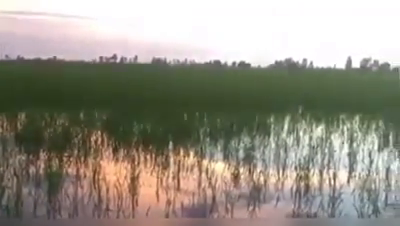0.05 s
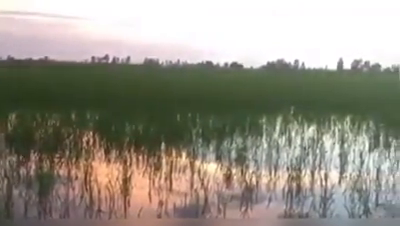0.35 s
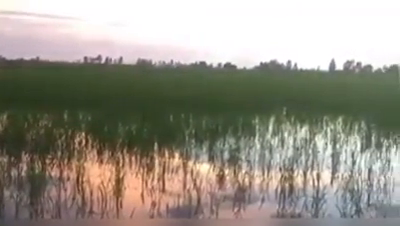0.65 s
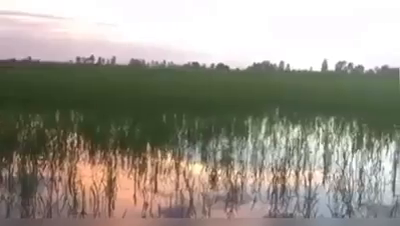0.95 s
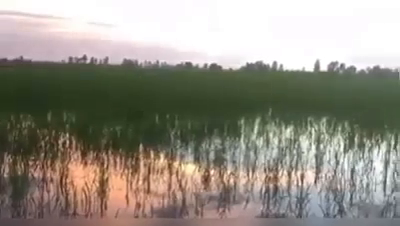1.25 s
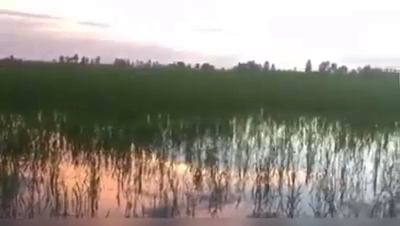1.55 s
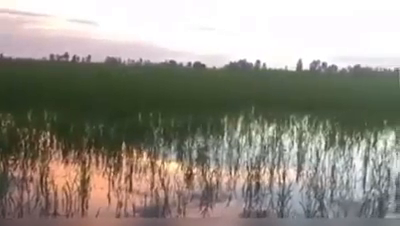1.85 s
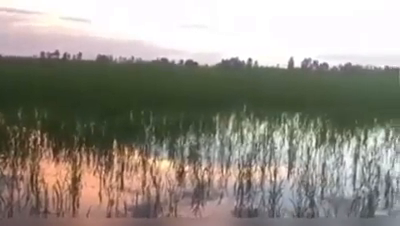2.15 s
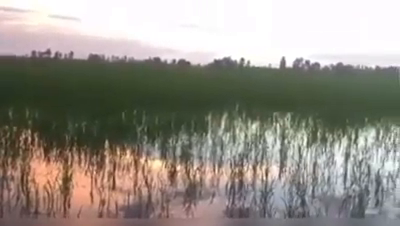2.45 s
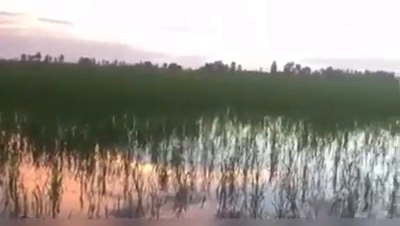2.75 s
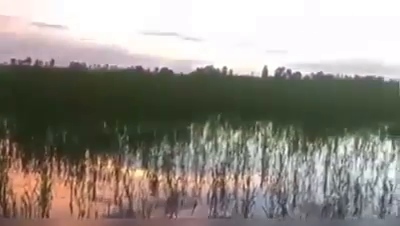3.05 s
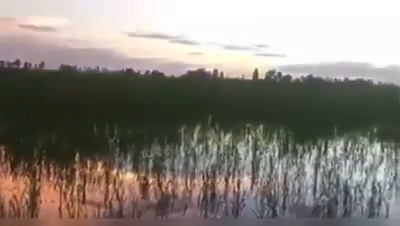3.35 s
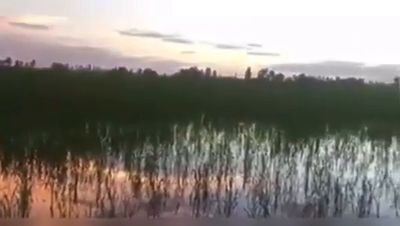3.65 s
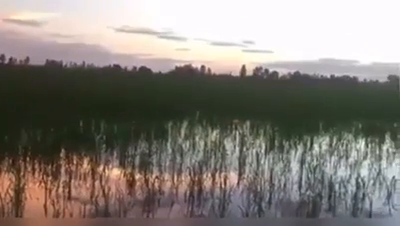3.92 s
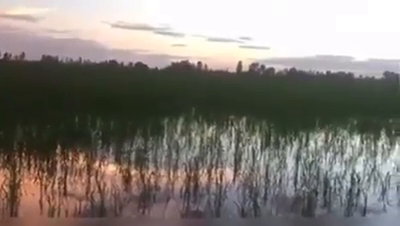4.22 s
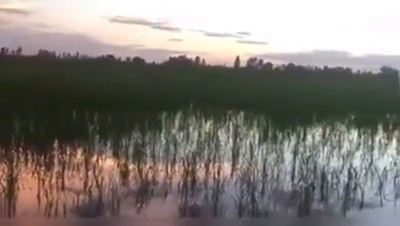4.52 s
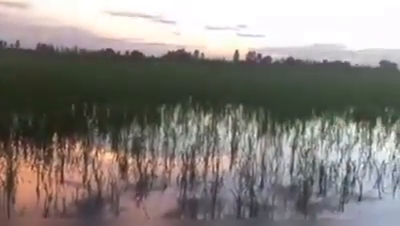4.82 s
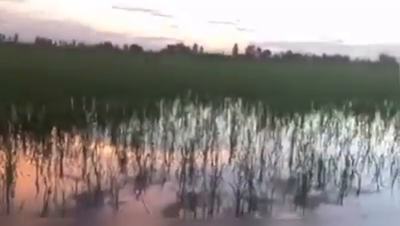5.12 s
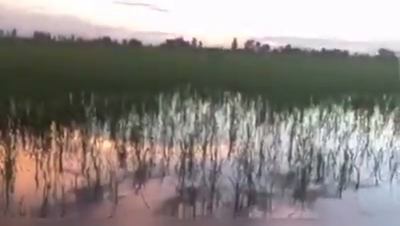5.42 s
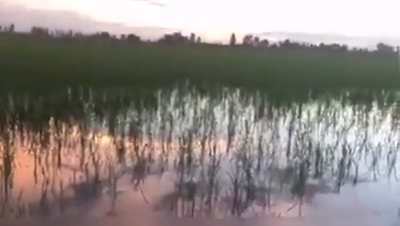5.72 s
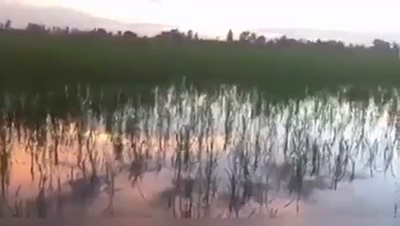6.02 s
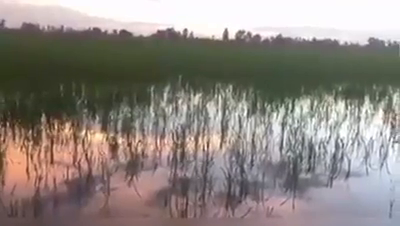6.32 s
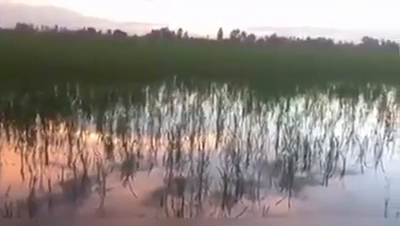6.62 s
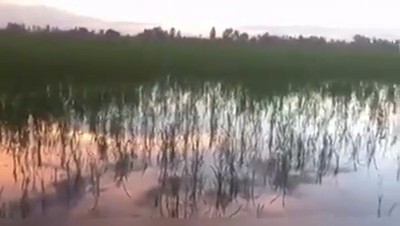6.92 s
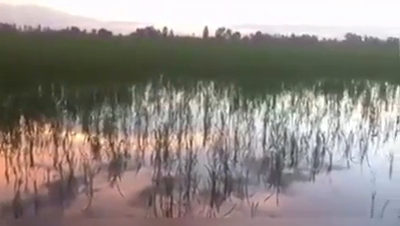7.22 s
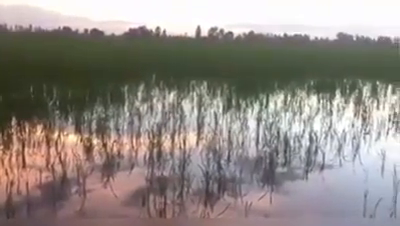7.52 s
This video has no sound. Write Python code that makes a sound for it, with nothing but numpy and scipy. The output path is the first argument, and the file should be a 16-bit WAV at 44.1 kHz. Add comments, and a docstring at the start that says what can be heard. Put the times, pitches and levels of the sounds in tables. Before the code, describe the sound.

Many frogs croak together in a dense, rapid, unbroken trill, with a faint low rumble and distant engine beneath.

```python
"""A flooded rice field at dusk: frogs croak, each about four times a second, over an answering far chorus.
A croak is a fast train of clicks ringing a vocal sac; it sinks in pitch as the pressure drops.
A clear-voiced frog leads, then one close by takes over with harsh rasps while a small one chirps between.
Hoarse and gliding neighbours join in. Far off a one-cylinder engine, probably a water pump, thuds on."""
import sys
import numpy as np
from scipy import signal
from scipy.fft import rfft, irfft
from scipy.io import wavfile
from scipy.ndimage import uniform_filter1d

SR = 44100
rng = np.random.default_rng(int(sys.argv[2]) if len(sys.argv) > 2 else 0)


def bounce(signal):
    """Save signal as a 16-bit WAV file at the path given by the first command-line argument."""
    frames = np.transpose(np.atleast_2d(signal))
    limited = np.clip(frames, -1, 1)
    pcm = np.round(limited * 32767).astype(np.int16)
    wavfile.write(sys.argv[1], SR, pcm)


N = 338247

# calls of the clear-voiced frog: t/s, sac f/Hz, level/dB
CLEAR_CALLS = [(.227, 3505, -29), (.479, 3235, -28), (.705, 3384, -30.5), (.991, 3666, -27.5),
               (1.207, 3610, -26.5), (1.419, 3550, -27), (1.633, 3644, -26.5), (1.854, 3560, -27),
               (2.061, 3516, -28), (2.271, 3540, -26.5), (2.476, 3458, -27), (2.682, 3484, -27),
               (2.894, 3480, -27.5), (3.123, 3460, -28.5)]
# rasps of the closest frog, faster, lower and duller as its bout goes on:
# t/s, length/s, pulse rate before locking to the sac/Hz, sac f/Hz, level/dB, treble/dB
RASPS = [(2.518, 0.012, 245, 3202, -30.5, 1), (2.806, 0.05, 218.3, 3376, -25, 5),
         (3.066, 0.055, 295, 3290, -25, 4), (3.306, .05, 338.3, 3215, -24.5, 4),
         (3.567, 0.063, 341.4, 3240, -25, 6.5), (3.807, 0.061, 345.6, 3317, -24.5, 0),
         (4.091, 0.065, 355, 3230, -25, -2), (4.357, 0.052, 355, 3190, -24.5, 2),
         (4.649, 0.062, 357, 3184, -25, -3), (4.888, 0.062, 364, 3160, -24.5, -2),
         (5.147, .057, 340, 3070, -25, -2), (5.449, 0.057, 340, 3040, -25.5, -2)]
# chirps of the small frog: t/s
CHIRPS = [3.235, 3.473, 3.686, 3.904, 4.13, 4.337, 4.567, 4.8, 5.040]
# croaks of the hoarse neighbours: t/s, length/s, sac f/Hz, level/dB, roughness (0 clear, 1 and up hoarse)
HOARSE_CROAKS = [(.008, 0.057, 3342, -27.5, 1.1), (0.087, 0.04, 3550, -50, 0.24),
                 (0.212, 0.042, 3390, -34, 0.42), (0.3, 0.1, 3390, -37, 0.9),
                 (0.443, 0.052, 3610, -35.5, 0.54), (0.532, 0.052, 2887, -35, 0.88),
                 (0.776, 0.032, 3680, -30.5, 0.3), (1.241, 0.037, 3360, -38.5, 0.4),
                 (1.607, 0.042, 2696, -37.5, 0.65), (1.883, 0.039, 2670, -36, 0.9),
                 (2.189, 0.04, 3216, -31.5, .8), (2.402, 0.05, 4050, -41.5, 0.24),
                 (3.01, .022, 4320, -40, 0), (3.372, 0.12, 3520, -44, 0.56), (4.249, 0.1, 3660, -51, 0.71),
                 (4.41, 0.064, 3054, -34.5, 0.5), (4.584, 0.068, 3610, -39, 0.2),
                 (4.785, 0.048, 3660, -41.5, 0.1), (5.057, 0.13, 3180, -40, 0.1),
                 (5.207, 0.044, 3410, -54, .6), (5.395, 0.064, 3470, -35, 0.18),
                 (5.537, 0.061, 3150, -36.5, 0.33), (5.655, 0.055, 3410, -36, 0.63),
                 (5.743, 0.06, 3170, -33, 0.82), (5.834, 0.053, 3750, -39, 0.4),
                 (5.879, 0.063, 3415, -35, 0.4), (5.962, 0.077, 3142, -36.5, 0.7),
                 (6.074, 0.05, 3640, -48, 0.7), (6.139, 0.062, 3315, -31, 0.6),
                 (6.267, 0.073, 3574, -35.5, 0.72), (6.353, 0.062, 3464, -44, 0.5),
                 (6.467, 0.043, 3530, -36, 0.7), (6.519, 0.047, 3170, -34, 0.98),
                 (6.61, 0.052, 3470, -37.5, 0.48), (6.716, 0.039, 3043, -31.5, 0.68),
                 (6.748, 0.084, 3646, -36.5, 0.88), (6.863, 0.059, 3170, -32, 0.74),
                 (6.96, .053, 3730, -36.5, 0.7), (7.011, 0.051, 3110, -33, 0.86),
                 (7.092, 0.067, 3300, -33, 0.76), (7.194, 0.042, 2862, -31, 0.73),
                 (7.234, 0.084, 3266, -31, 0.77), (7.381, 0.057, 3246, -34.5, 0.6),
                 (7.431, 0.041, 3616, -32, 0.4), (7.501, 0.051, 3424, -32.5, 0.3),
                 (7.639, 0.043, 3266, -33.5, 0.7)]
# gliding calls: t/s, pulse rate before locking to the sac/Hz, sac f/Hz, level/dB,
# fall as a share of the pitch (below 0 it rises), place of the crest (0 = start)
GLIDES = [(.838, 570, 3427, -30.5, 0.057, 0.38), (.85, 460, 2790, -32.5, 0.059, 0.48),
          (.896, 600, 3970, -36, -0.11, 0.024), (1.041, 570, 4460, -42, 0.056, 0.34),
          (1.107, 560, 2800, -35, 0.071, 0.54), (1.142, 490, 3460, -29.5, 0.12, 0.56),
          (1.357, 580, 4003, -31, 0.049, 0.49), (1.357, 470, 2386, -35.5, 0.0057, 0.66),
          (1.463, 450, 3210, -30, .09, 0), (1.763, 557, 3090, -33, 0.12, 0),
          (1.917, 500, 4000, -35.5, 0.034, 0), (2.165, 570, 3990, -39, 0.0052, 0.72),
          (2.302, 536, 2990, -33, 0.16, 0.24), (2.568, 610, 3190, -31.5, 0.03, 0.1),
          (4.171, 536, 2946, -34, 0.092, .3), (5.323, 465, 3190, -31.5, 0.12, 0.39),
          (5.576, 480, 3406, -39, 0.1, .3), (5.66, 470, 3740, -37, 0.037, 0.51),
          (6.005, 500, 3490, -39.5, .06, 0.62), (6.35, 470, 3350, -33.5, -0.097, 0),
          (7.467, 480, 2885, -27.5, 0.076, 0.012)]
# tone of one pulse, apart from the sac's ring: f/Hz, level/dB
CROAK_COLOUR = [(600, -37.5), (1060, -22.5), (1450, 2), (1900, 0), (2600, 1), (3500, 1), (4200, -7),
                (5000, -13), (6200, -14.5), (7000, -29), (9300, -32), (11000, -52.5), (13300, -35),
                (15500, -48.5)]
RASP_COLOUR = [(500, -66.5), (750, -29), (950, -16.5), (1120, -14.5), (1380, 2), (2000, 2), (2700, 3),
               (3900, 7), (4800, -7), (6000, -7), (7000, -20.5), (9300, -20), (11000, -26.5), (14000, -63)]
CHIRP_COLOUR = [(1000, -36.5), (2000, -9), (3400, -7), (4200, 2.5), (4700, -8), (5200, -4.5), (6200, -3),
                (7000, -26), (10000, -32), (15000, -34)]
FAR_COLOUR = [(600, -47.5), (1100, -21), (1450, -2.5), (1900, 0), (2600, -4), (3500, -3), (4200, -6),
              (5000, -16), (6200, -18.5), (7000, -30.5), (9300, -31), (11000, -53), (13300, -39),
              (15500, -62)]
# slow swell of the far chorus, before its lulls: t/s, level/dB
CHORUS_SWELL = [(0, -29.5), (1.0, -27.5), (2.0, -28.5), (3.0, -30.5), (5.0, -29), (5.7, -32), (7.67, -31.5)]
# rings of the pump's exhaust pipe: f/Hz, length/s, rms level/dB
EXHAUST_RINGS = [(179.1, 0.029, -46), (332.4, 0.043, -65)]
# low rumble and still air: f/Hz, relative level/dB
AIR_COLOUR = [(22, -26), (35, -20.5), (50, -7), (65, -2.5), (92, 2), (130, -4.5), (200, -5.5), (265, -28),
              (340, -21.5), (450, -32), (700, -31), (1500, -35.5), (6000, -51.5), (15000, -62.5)]


def clear_frog():
    """The lead voice: one ringing, slightly falling call, hoarse at first and clearing as it warms up."""
    out, warm_up_s = np.zeros(N), .7
    for s, sac_hz, db in CLEAR_CALLS:
        rough = .02 + .9 * np.exp(-s / warm_up_s)
        add(out, s, neighbour_call(length=.056, pulse_hz=445, sac_hz=sac_hz, db=db,
                                   fall=.0698, rough=rough))
    return out


def closest_frog():
    """Rasps of sharp, separate pulses; each is followed by short reflections that differ a little from rasp to
    rasp."""
    out, taut_pulse_hz = np.zeros(N), 350
    for s, length, pulse_hz, sac_hz, db, treble_db in RASPS:
        width_hz = 420 * (taut_pulse_hz / pulse_hz) ** 1.8   # a slacker sac pulses slower and rings less
        pulse = brighten(pulse_of(RASP_COLOUR, sac_hz, follow=1.09), treble_db, corner_hz=6000)
        rasp = croak(pulse, length, locked(pulse_hz, sac_hz), sac_hz, fall=.095, crest=.25, jitter=.006,
                     sac_width_hz=width_hz, sac_db=10.5, attack_s=.002, release_s=.021,
                     stumble=.045, slack=.15, uneven_db=1.7, fade_db=1.5)
        reflections = field_tail(np.pad(rasp, (0, len(rasp))), t60=.037, build_s=.002)
        add(out, s, from_db(db) * rasp)
        add(out, s, from_db(db - 4.5) * reflections)
    return out


def small_frog():
    """Chirps: the high sac holds its note while clean overtones arch and slide down through it."""
    out, pulse = np.zeros(N), pulse_of(CHIRP_COLOUR)
    for s, tension in zip(CHIRPS, rng.standard_normal(len(CHIRPS))):
        chirp = croak(pulse, length=.062, pulse_hz=362 * np.exp(.018 * tension), sac_hz=4410,
                      fall=.102, crest=.26, jitter=.003, sac_width_hz=360, sac_db=32,
                      attack_s=.013, release_s=.014, slack=1)
        add(out, s, from_db(-35) * chirp)
    return out


def hoarse_frogs():
    """Many hoarser frogs croak in turn, each with a pulse rate and fall of its own."""
    out = np.zeros(N)
    for s, length, sac_hz, db, rough in HOARSE_CROAKS:
        tension, droop = rng.standard_normal(2)
        pulse_hz, fall = 445 * np.exp(.1 * tension), .0797 + .031 * droop
        add(out, s, neighbour_call(length, pulse_hz, sac_hz, db, fall, rough))
    return out


def gliding_frogs():
    """Smooth voices whose overtones arch, climb or slide down."""
    out, length = np.zeros(N), .052
    for s, pulse_hz, sac_hz, db, fall, crest in GLIDES:
        add(out, s, neighbour_call(length, pulse_hz, sac_hz, db, fall, rough=.15, crest=crest))
    return out


def neighbour_call(length, pulse_hz, sac_hz, db, fall, rough, crest=.14):
    """Clear callers pulse evenly into a sharp sac ring; rough ones jitter, waver and ring less."""
    rough, fall, crest = np.clip(rough, 0, 1), np.clip(fall, -.18, .18), np.clip(crest, 0, .65)
    typical_db = -32.5
    treble_db = 2.4 * (db - typical_db)   # leaves soak up the treble of weaker, more distant callers
    pulse = brighten(pulse_of(CROAK_COLOUR, sac_hz), treble_db, corner_hz=11500)
    call = croak(pulse, length, locked(pulse_hz, sac_hz), sac_hz, fall, crest,
                 jitter=.0018 + .024 * rough ** 2, waver=.03 * rough, throaty_db=7 * rough ** .42,
                 sac_width_hz=300 + 300 * rough, sac_db=22.5 - 5.6 * rough,
                 attack_s=.002 + .004 * rough, release_s=.014)
    return from_db(db) * call


def croak(pulse, length, pulse_hz, sac_hz, fall, crest, jitter, sac_width_hz, sac_db, attack_s,
          release_s, stumble=0, slack=0, uneven_db=1, throaty_db=0, waver=0, fade_db=0):
    """One call at unit level: uneven larynx clicks ring the sac; the pitch sinks as the pressure drops."""
    size, count = int((length + release_s + .0049) * SR), int((length + release_s) * pulse_hz) + 1
    progress = np.minimum(np.arange(count) / (length * pulse_hz), 1)
    arch = ((progress - crest) / (1 - crest)) ** 2   # zero at the crest, where the pitch turns
    wander = 3 * uniform_filter1d(rng.standard_normal(count), size=9)   # drifts over nine pulses
    pitch = 1 + fall * (arch.mean() - arch) + waver * (wander - wander.mean())
    # the larynx stumbles before it settles
    hitches = stumble * np.exp(-3 * progress) * rng.exponential(1, count) ** 2
    periods = np.maximum(1 / pitch + jitter * rng.standard_normal(count) + hitches, .5)
    click_s = (np.cumsum(periods) - periods[0]) / pulse_hz

    attack = np.clip((click_s + 1 / pulse_hz) / attack_s, 0, 1)
    release = np.clip((length + release_s / 2 - click_s) / release_s, 0, 1)
    pressure = np.minimum(periods, 2) ** .7   # a longer wait builds more pressure
    limp_db = throaty_db * (np.arange(count) % 2)   # a hoarse throat weakens every second pulse
    click_db = uneven_db * rng.standard_normal(count) - limp_db - fade_db * arch
    strength = attack * release * pressure * from_db(click_db)
    clicks = np.zeros(size)
    sample, fraction = np.divmod(click_s * SR, 1)
    for step, share in ((0, 1 - fraction), (1, fraction)):   # a click falls between two samples
        np.add.at(clicks, np.minimum(sample.astype(int) + step, size - 1), strength * share)

    # a taut sac follows the pulse rate closely; at slack 1 it holds still
    ring_hz = sac_hz * np.interp(np.arange(size) / SR, click_s, pitch) ** (1 - slack)
    ring = from_db(sac_db) * sac_ring(clicks, ring_hz, sac_width_hz)
    voice = np.convolve(clicks + ring, pulse)[:size]
    return rms_one(voice) * np.sqrt(size / (length * SR))


def sac_ring(x, hz, width_hz):
    """The vocal sac: one resonance whose centre may glide, gain 1 at its peak."""
    pole = np.exp(-np.pi * width_hz / SR)
    carrier = np.exp(2j * np.pi * np.cumsum(hz) / SR)
    return 2 * np.real(carrier * signal.lfilter([1 - pole], [1, -pole], x / carrier))


def locked(pulse_hz, sac_hz):
    """The larynx locks its pulse rate on to the sac, so one overtone sings out."""
    return sac_hz / round(sac_hz / pulse_hz)


def pulse_of(colour, sac_hz=3400, follow=.63, size=512):
    """The tightest pulse with this colour (minimum phase); a smaller sac shifts the whole colour up."""
    shifted = np.array(colour) * [(sac_hz / 3400) ** follow, 1]   # 3400 Hz: a frog of middle size
    cepstrum = irfft(np.log(gains(shifted, size)))
    cepstrum[1:size // 2] *= 2
    cepstrum[size // 2 + 1:] = 0
    return irfft(np.exp(rfft(cepstrum)))


def far_chorus(count=10, pace_s=.247):
    """Far frogs take turns, so the trill never breaks; each has its own note, blurred by the field."""
    calls, pulse, t = np.zeros(N), pulse_of(FAR_COLOUR), np.arange(N) / SR
    for turn, own_hz in enumerate(rng.permutation(np.linspace(2950, 3750, count))):
        pulse_hz = rng.uniform(350, 540)
        for s in np.arange(-pace_s * turn / count, N / SR, pace_s):
            late, sharp, tension, loud, droop = rng.standard_normal(5)
            call = croak(pulse, length=.065, pulse_hz=pulse_hz * np.exp(.08 * tension),
                         sac_hz=own_hz * (1 + .036 * sharp), fall=.0886 + .0496 * droop, crest=.25,
                         jitter=.0221, sac_width_hz=440, sac_db=11.5, attack_s=.01, release_s=.022,
                         slack=.13, waver=.015)
            add(calls, s + .008 * late, from_db(1.7 * loud) * call)
    chorus = rms_one(calls + from_db(-8) * field_tail(calls, t60=.4, build_s=.0069))
    swell_db = np.interp(t, *np.transpose(CHORUS_SWELL))
    return chorus * from_db(swell_db + lull_db(t))


def lull_db(t, depth_db=-5, answer_s=.053, ebb_s=.035):
    """The chorus answers each clear call, croak, rasp or chirp, then ebbs until the next one."""
    starts = np.sort([0, *CHIRPS, *(row[0] for row in CLEAR_CALLS + HOARSE_CROAKS + RASPS)])
    wait_s = t - starts[np.searchsorted(starts, t, side="right") - 1]
    return depth_db * uniform_filter1d(np.clip((wait_s - answer_s) / ebb_s, 0, 1), size=600)


def field_tail(x, t60, build_s):
    """Stalks and banks scatter the calls into a short diffuse tail."""
    t = np.arange(int(.4 * SR)) / SR
    tail = rng.standard_normal(len(t)) * from_db(-60 * t / t60) * (1 - np.exp(-t / build_s))
    return signal.fftconvolve(x, tail / np.linalg.norm(tail))[:N]


def pump(firing_hz=19.74, first_s=.042):
    """Every firing puffs through the exhaust pipe; distance leaves two low, soft-edged rings."""
    firings, out = np.zeros(N), np.zeros(N)
    at = (np.arange(first_s, N / SR, 1 / firing_hz) * SR).astype(int)
    firings[at] = from_db(rng.normal(0, .32, len(at)))
    for hz, length, db in EXHAUST_RINGS:
        t = np.arange(int(length * SR)) / SR
        puff = np.sin(np.pi * t / length) ** 2 * np.sin(2 * np.pi * hz * t)
        out += from_db(db) * rms_one(signal.fftconvolve(firings, puff)[:N])
    return out


def air():
    """The bed: a weak steady rumble with a trace of hiss."""
    spectrum = rfft(rng.standard_normal(N)) * gains(AIR_COLOUR, N)
    return from_db(-46.5) * rms_one(irfft(spectrum, N))


def brighten(x, db, corner_hz):
    """A treble shelf."""
    treble = signal.lfilter(*signal.butter(1, corner_hz, "high", fs=SR), x)
    return x + (from_db(db) - 1) * treble


def gains(colour, size):
    """A colour table as an EQ curve on the bins of an FFT."""
    hz, db = np.transpose(colour)
    return from_db(np.interp(np.log(np.fft.rfftfreq(size, 1 / SR) + 1), np.log(hz), db))


def from_db(db):
    """Decibels to gain."""
    return 10 ** (np.asarray(db) / 20)


def rms_one(x):
    """Scale to rms 1."""
    return x / np.sqrt(np.mean(x ** 2) + 1e-20)


def add(out, s, x):
    """Mix x into out from time s on."""
    at = int(round(s * SR))
    x, at = x[max(-at, 0):], max(at, 0)
    out[at:at + len(x)] += x[:max(len(out) - at, 0)]


def scene():
    """A mono mix at the edge of the field; the neighbours, a few metres off, share one short tail."""
    neighbours = clear_frog() + small_frog() + gliding_frogs() + hoarse_frogs()
    tail = from_db(-7.5) * field_tail(neighbours, t60=.14, build_s=.0064)
    return (neighbours + tail + closest_frog() + far_chorus() + pump() + air())[None]


def record(dry):
    """A steep high cut, 70 dB down from 15.7 kHz."""
    return signal.sosfilt(signal.cheby2(14, 70, 15700, fs=SR, output="sos"), dry)


dry = scene()
out = record(dry)
bounce(out)
```